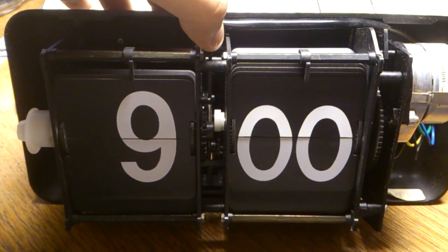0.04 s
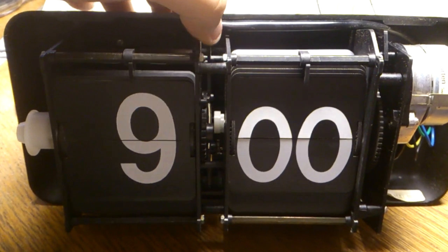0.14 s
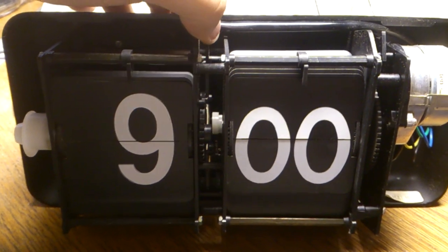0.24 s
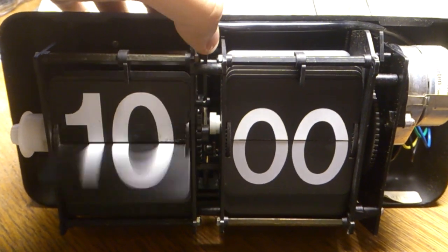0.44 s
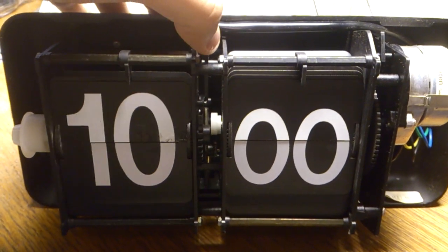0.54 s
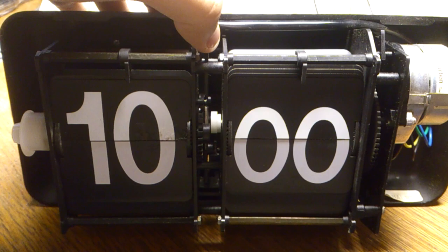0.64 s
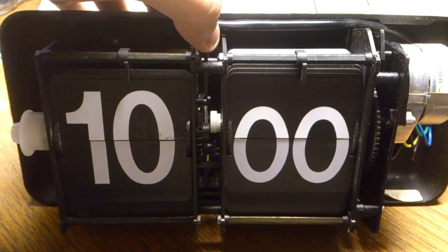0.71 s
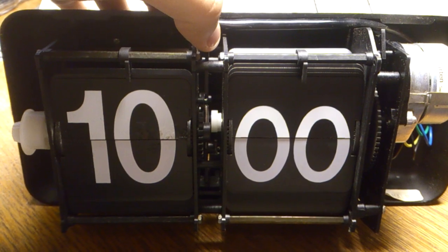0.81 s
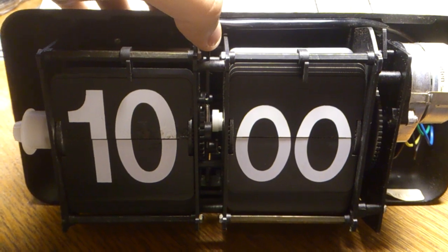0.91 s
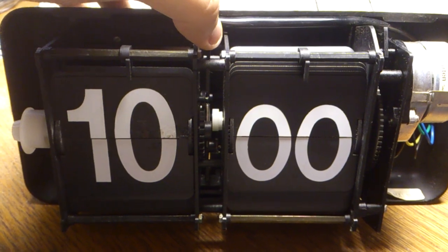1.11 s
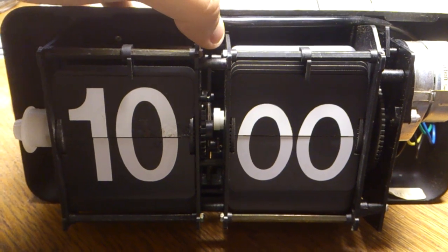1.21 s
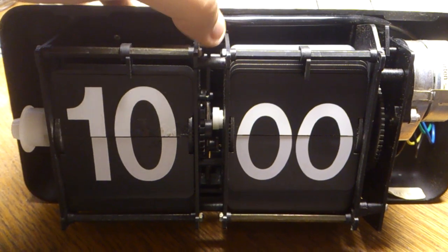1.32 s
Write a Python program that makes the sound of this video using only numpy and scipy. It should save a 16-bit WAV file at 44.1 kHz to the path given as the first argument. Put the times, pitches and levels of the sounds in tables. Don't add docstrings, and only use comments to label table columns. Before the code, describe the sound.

Flip clock mechanism snaps, its plastic flap slaps and rattles down, then ticks to rest over faint hum

```python
import sys
import numpy as np
from scipy import signal
from scipy.fft import rfft, irfft
from scipy.io import wavfile
from scipy.ndimage import uniform_filter1d

SR = 44100
rng = np.random.default_rng(int(sys.argv[2]) if len(sys.argv) > 2 else 0)


def voltage_ratio(level):
    return 10 ** (np.asarray(level, float) / 20)


def wrap_up_sound(samples):
    columns = np.atleast_2d(samples).T
    tamed = np.clip(columns, -1, 1)
    steps = np.round(tamed * 32767).astype(np.int16)
    wavfile.write(sys.argv[1], SR, steps)


N = 59535

# (time [s], strength [dB], middle colour [dB], treble colour [dB], contact length [ms])
LATCH_BLOWS = [
    (0.2007, -30, 5.5, 8, 0.52),
    (0.202, -28, 8, 7.5, 0.67),
    (0.2054, -35, -6, 1, 0.69),
]
# (frequency [Hz], level [dB], time to fade by 60 dB [s])
FLAP_TONES = [(1030, -7.5, 0.026), (1690, -16, 0.042), (1965, 6, 0.013), (2316, 7, 0.023),
              (2715, 4.5, .012), (4097, 0, 0.0222), (4760, 2.5, 0.012), (5330, -6, 0.016),
              (6730, -5, 0.0068), (8040, -0.5, 0.0071), (8930, 1, 0.0075), (9780, 0.5, 0.01),
              (10500, -3.5, 0.0087), (12200, -29, .008)]


def evened(x):
    return x / np.sqrt(np.mean(x ** 2) + 1e-20)


def read(points, hz):
    f, value = np.transpose(points)
    return np.interp(np.log(hz + 1), np.log(f + 1), value)


def add(mix, s, sound):
    part = mix[round(s * SR):][:len(sound)]
    part += sound[:len(part)]


def drift(size):
    smooth = uniform_filter1d(rng.standard_normal(N), size)
    return evened(uniform_filter1d(smooth, size))


def air():
    # (frequency [Hz], level [dB per Hz])
    air_spectrum = [(32, -51), (60, -9.5), (250, -3.5), (600, -8), (1200, -9.5), (2200, -17.5), (4000, -29),
                    (15000, -33.5)]
    frames, hz = N // 256 + 5, np.fft.rfftfreq(1024, 1 / SR)
    a, b, patches = rng.standard_normal((frames, 513, 3)).T
    patches = uniform_filter1d(patches, 12, 0)
    patches = evened(uniform_filter1d(patches, 10, 1))
    level_db = read(air_spectrum, hz)[:, None] + 0.6 * np.tanh(patches)
    z = (a + 1j * b) * voltage_ratio(level_db) * (hz < 15700)[:, None]
    hiss = signal.istft(z, nperseg=1024, noverlap=768)[1][:N]
    return voltage_ratio(-55.5) * evened(hiss)


def hum():
    # (frequency [Hz], level [dB rms])
    hum_tones = [(100.1, -59), (579.8, -63.5), (434.7, -72), (348.2, -70)]
    t, out = np.arange(N) / SR, np.zeros(N)
    for hz, db in hum_tones:
        waver_db = 0.5 * drift(size=2500)
        out += voltage_ratio(db + waver_db) * np.sin(2 * np.pi * (hz * t + rng.random()))
    return out


def fan():
    # (frequency [Hz], width [Hz], level [dB rms])
    fan_drones = [(137.8, 26, -62.5), (173.3, 9.4, -66), (232.2, 14.2, -60.5), (273, 30.4, -65),
                  (351.4, 16, -67.5)]
    fine, out = np.fft.rfftfreq(N, 1 / SR), np.zeros(N)
    for hz, width, db in fan_drones:
        bell = np.exp(-((fine - hz) / width) ** 2)
        out += voltage_ratio(db) * evened(irfft(rfft(rng.standard_normal(N)) * bell, N))
    return out


def desk(x):
    t = np.arange(6000) / SR
    echoes = rng.choice([-1., 1.], 6000) * (rng.random(6000) < .1)
    tail = echoes * voltage_ratio(-60 * t / 0.082) * (t > .002)
    return voltage_ratio(-20) * signal.oaconvolve(x, tail / np.linalg.norm(tail))[:N]


def case(x, low_hz):
    low = signal.butter(4, low_hz, "highpass", fs=SR, output="sos")
    high = signal.butter(5, 12550, fs=SR, output="sos")
    return signal.sosfilt(np.vstack([low, high]), x)


def spring():
    spring_hz, pawl_hz = 4580, 3240
    out, t = np.zeros(N), np.arange(6600) / SR
    wobble = np.cumsum(30 * drift(size=120)[:6600]) / SR
    pair = np.sin(2 * np.pi * (spring_hz * t + wobble)) + .6 * np.sin(2 * np.pi * (spring_hz + 62) * t)
    shake_db = 5.6 * np.tanh(drift(size=150)[:6600])
    pawl_ring = voltage_ratio(-56 - shake_db - 60 * t / 0.24) * np.sin(2 * np.pi * pawl_hz * t)
    spring_ring = voltage_ratio(-51 + shake_db - 60 * t / .45) * pair * np.sqrt(1 - t / t[-1])
    start_s = LATCH_BLOWS[2][0]
    add(out, start_s, pawl_ring)
    add(out, start_s, spring_ring)
    return out


def slips(per_s, spread_db):
    strength = voltage_ratio(spread_db * np.minimum(rng.exponential(1, N), 4))
    return strength * (rng.random(N) < per_s / SR) * rng.choice([-1., 1.], N)


def friction():
    # (time [s], pressure [dB], treble colour [dB])
    creep = [
        (.135, -71, -3),
        (0.149, -54, -13),
        (0.167, -57, -2.5),
        (.198, -46, -6),
        (.21, -42.5, -2),
        (.245, -54, 2),
        (0.289, -60, -1),
        (.33, -77, 6),
    ]
    # (time [s], pressure [dB], treble colour [dB])
    rattle = [
        (.346, -71, 7),
        (.359, -59, -11),
        (.367, -42.5, -8),
        (.393, -51, -0.5),
        (.412, -48.5, 2),
        (0.448, -49, -3.5),
        (.485, -59.5, 1.5),
        (.505, -60.5, -11),
        (.524, -71, -6),
    ]
    # (time [s], pressure [dB], treble colour [dB])
    slide = [
        (.527, -72, -4),
        (0.536, -53, -8.5),
        (.555, -56.5, -12),
        (.572, -47, -37),
        (0.587, -57, -4),
        (.63, -83, 11.5),
    ]
    s, db, high_db = np.transpose(np.vstack([creep, rattle, slide]))
    t, out = np.arange(N) / SR, np.zeros(N)
    level_db, treble_db = np.interp(t, s, db, -120, -120), np.interp(t, s, high_db)
    ticks = evened(slips(per_s=2500, spread_db=2.5))
    for hz, tone_db, t60 in FLAP_TONES:
        flicker_db = 1.8 * drift(size=130)
        rub = evened(slips(per_s=12000, spread_db=2) * voltage_ratio(flicker_db))
        ring = voltage_ratio(-60 * t[:800] / (t60 * .27)) * np.sin(2 * np.pi * hz * t[:800])
        treble = np.clip(np.log2(hz / 2800) / 0.53, 0, 1)
        tick_share = treble * .25
        push = np.sqrt(1 - tick_share) * rub + np.sqrt(tick_share) * ticks
        push = push * voltage_ratio(level_db + tone_db - 9.5 + treble * treble_db)
        out += signal.oaconvolve(push, ring / np.linalg.norm(ring))[:N]
    return out


def knocks():
    # (time [s], strength [dB], pitch [Hz], time to fade by 60 dB [s], rise
    lone_rings = [(.2183, -24.5, 1350, 0.017, 0.96), (.2215, -35, 1180, 0.047, 0.58),
                  (.2012, -17, 2320, 0.026, 2.45), (.2012, -20, 3125, 0.021, 3), (.224, -39, 1900, .02, 3),
                  (0.17, -41, 2600, .015, 3), (.3695, -35, 2600, .025, 3.7), (0.2, -40, 2900, .02, 3.1),
                  (0.22, -33, 1145, 0.035, 1.2), (.3485, -36, 1110, 0.045, 1.2),
                  (.364, -41, 1200, 0.057, 0.89), (.3625, -42.5, 745, 0.12, 1.5),
                  (.366, -43.5, 625, .1, 1.2), (.369, -40.5, 915, 0.041, 1.2),
                  (.350, -39, 1276, 0.025, 0.86), (.40, -49, 740, 0.11, 2), (.44, -46.5, 760, 0.088, 2),
                  (.42, -50, 540, 0.066, 2), (.3635, -31, 1580, 0.033, 2.5),
                  (.3625, -28, 2310, 0.035, 3.5), (.4145, -32.5, 1900, .03, 1.8),
                  (0.5, -39, 2050, .03, 4.6), (0.28, -44, 2200, 0.017, 3), (.398, -35.5, 5100, 0.023, 5),
                  (.379, -41, 4100, 0.041, 5), (.445, -38, 2300, .04, 3.5), (.462, -41, 5000, 0.022, 3.5),
                  (.544, -42.5, 3900, 0.045, 6.3), (0.47, -47, 3900, 0.025, 5.5),
                  (.372, -44, 98.1, 0.22, 0.96), (0.48, -58, 1600, 0.02, 5.9),
                  (.3473, -29, 2300, 0.016, 1.3), (.3475, -29.5, 2630, 0.012, 1.6),
                  (.3478, -33.5, 1700, 0.025, 1.1), (.2008, -18.5, 1602, 0.02, 0.86),
                  (.5785, -37.5, 2550, 0.02, 2.8), (.563, -42, 1010, 0.039, 0.91),
                  (.5635, -44, 760, 0.045, 1.2), (.578, -44.5, 700, 0.071, 1.5),
                  (.585, -46, 900, 0.052, 1.4), (.5627, -27, 2540, 0.021, 2.7),
                  (.571, -41, 3100, 0.021, 4)]
    out, t = np.zeros(N), np.arange(4000) / SR
    for s, db, hz, t60, rise in lone_rings:
        swell = 1 - np.exp(-(t * hz / rise) ** 2)
        add(out, s, voltage_ratio(db - 60 * t / t60) * swell * np.sin(2 * np.pi * hz * t))
    return out


def struck(tones, burst, mid_db, high_db, detune, crack_db):
    t = np.arange(2500) / SR
    hz, db, t60 = np.transpose(tones)[:, :, None]
    colour_db = read([(2800, 0), (4300, mid_db), (8500, high_db)], hz)
    rings = voltage_ratio(-60 * t / t60) * np.sin(2 * np.pi * hz * detune[:, None] * t)
    rings = signal.fftconvolve(rings, burst[None], axes=1)
    rings = rings / np.linalg.norm(rings, axis=1, keepdims=True)
    rings = rings * voltage_ratio(db + colour_db) / np.linalg.norm(voltage_ratio(db))
    edges = signal.butter(4, [1500, 12000], "bandpass", fs=SR, output="sos")
    crack = signal.sosfilt(edges, np.pad(burst, (0, len(t) - 1)))
    return rings.sum(0) + voltage_ratio(crack_db + min(mid_db, high_db, 0)) * crack


def hits(blows, tones, detune, crack_db):
    out, t = np.zeros(N), np.arange(1200) / SR
    for s, db, mid_db, high_db, ms in blows:
        u = t * 1000 / max(ms, .2)
        burst = rng.standard_normal(1200) * u * np.exp(-u ** 1.45)
        burst = burst / np.linalg.norm(burst)
        pitch = 1 + detune * rng.standard_normal(len(tones))
        add(out, s, voltage_ratio(db) * 9.68 * struck(tones, burst, mid_db, high_db, pitch, crack_db))
    return out


def latch():
    # (frequency [Hz], level [dB], time to fade by 60 dB [s])
    latch_tones = [(1330, -24, 0.0121), (1890, -1.5, 0.008), (6540, -13, 0.0091), (2410, -7, 0.02),
                   (3130, -10, 0.021), (3720, -11.5, 0.018), (4260, -7.5, 0.013), (4590, -11.5, 0.0098),
                   (5180, -9.5, 0.016), (7800, -5, 0.0045), (8770, -4, 0.007), (9280, -2, 0.0063),
                   (10400, -14, 0.012), (12400, -11.5, 0.0078)]
    return case(hits(LATCH_BLOWS, latch_tones, detune=0, crack_db=-29), low_hz=1250)


def settle():
    # (time [s], strength [dB], middle colour [dB], treble colour [dB], contact length [ms])
    settle_blows = [
        (.5618, -25, -4.5, -4, 2.2),
        (.5662, -31.5, -13, -4.5, 2.1),
        (.5735, -50.5, -6, -9, 1.7),
        (.5785, -46.5, -5, -16, 2.3),
    ]
    # (frequency [Hz], level [dB], time to fade by 60 dB [s])
    settle_tones = [(1340, -12, 0.018), (2270, -3.5, 0.012), (6000, -12, 0.012), (3700, -34, .008),
                    (4480, 0, 0.013), (4720, 4.5, 0.011), (5630, 3, 0.01), (6500, -11, .006),
                    (7600, -3.5, .006), (8970, -5.5, 0.0055), (9730, 0.5, 0.0034), (10830, -1, 0.0055),
                    (11300, -24, .006), (12900, -27, .005)]
    return case(hits(settle_blows, settle_tones, detune=0, crack_db=-14), low_hz=1950)


def flap():
    # (time [s], strength [dB], middle colour [dB], treble colour [dB], contact length [ms])
    flap_blows = [(.3472, -36, -15, -21, 2.1), (.3622, -37.5, 2.5, -10, 1.7), (.366, -39.5, -2.5, 2.5, 1.5),
                  (.370, -36.5, -8, -10, 1.1), (.377, -44, 7.5, 1, 4.6), (.3845, -47, 1, -9, 3.),
                  (.3975, -46.5, -6, 15, 1.45), (.4005, -46, 4, 15.5, 1.2), (.402, -42.5, 11, -12, 2.8),
                  (.405, -44, -1, -14, 1.5), (.4082, -30, -30, -3, 0.54), (.4105, -39.5, -15, -14, 1),
                  (.4215, -40.5, 8, -17, 3), (.429, -41.5, 2, -17, 5.1), (.444, -40, 3, -28, 3.2),
                  (.461, -67, -1, 0, 4.), (.471, -45.5, -8, -3, 2.2), (.479, -48, 4, 4, 2.4)]
    slaps = hits(flap_blows, FLAP_TONES, detune=0.024, crack_db=-13.5)
    return case(slaps + friction(), low_hz=850)


def scene():
    room = air() + hum() + fan()
    clock = spring() + knocks() + latch() + settle() + flap()
    return (room + desk(clock) + clock)[None]


def low_pass(x):
    return signal.sosfilt(signal.butter(12, 16360, fs=SR, output="sos"), x)


def record(dry):
    edge = signal.firwin(511, 16400, window=("kaiser", 9), fs=SR)
    mix = signal.oaconvolve(dry, edge[None], "same")
    return low_pass(mix)


dry = scene()
out = record(dry)
wrap_up_sound(out)
```